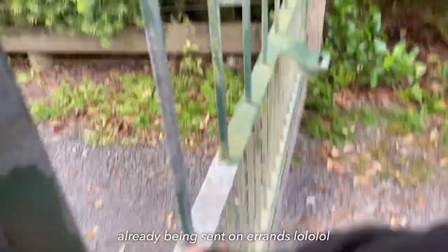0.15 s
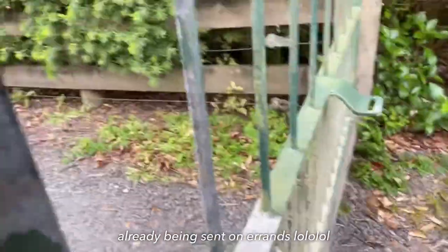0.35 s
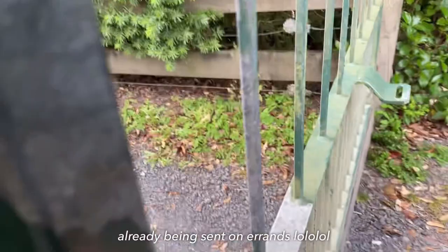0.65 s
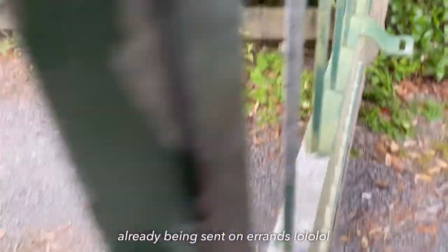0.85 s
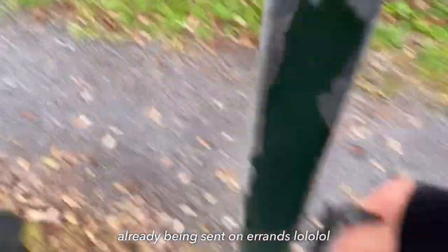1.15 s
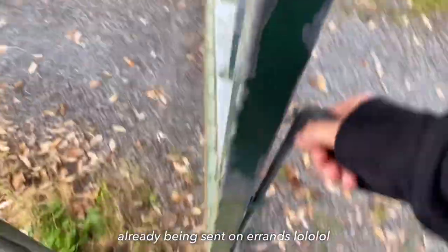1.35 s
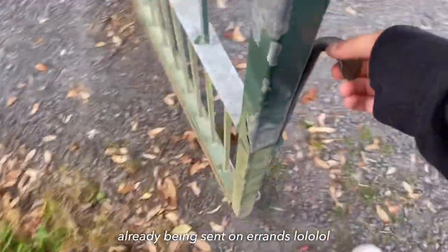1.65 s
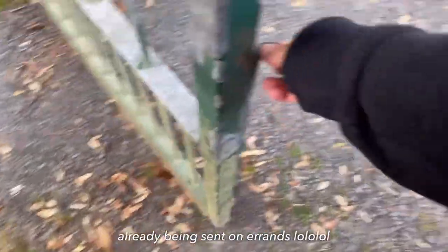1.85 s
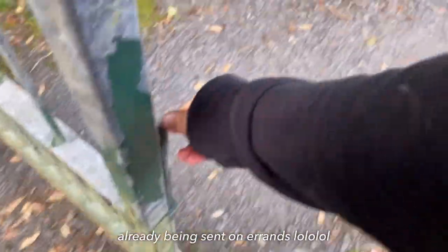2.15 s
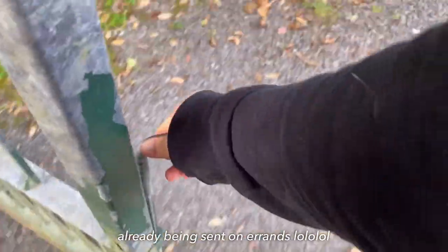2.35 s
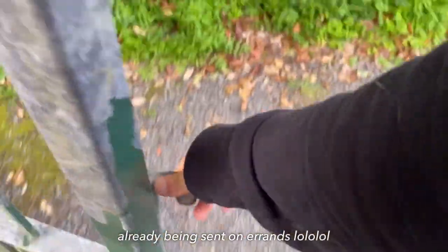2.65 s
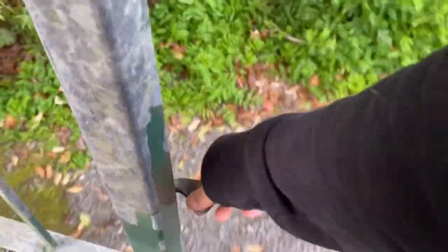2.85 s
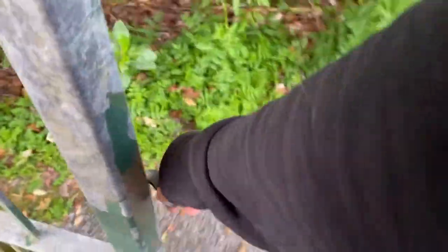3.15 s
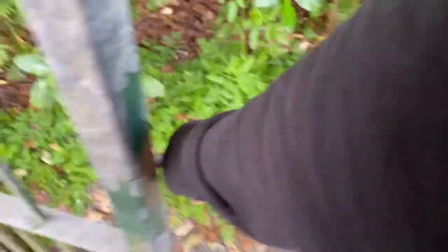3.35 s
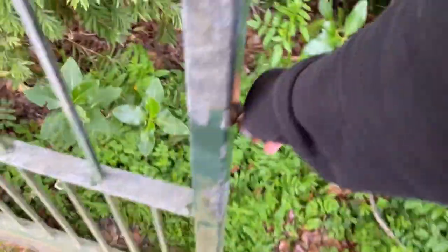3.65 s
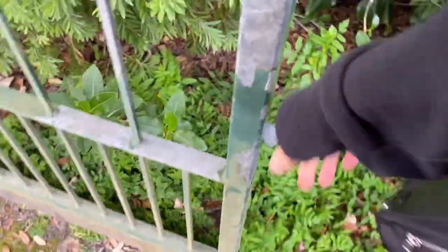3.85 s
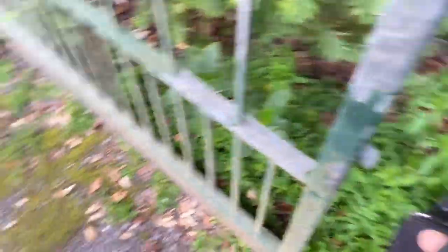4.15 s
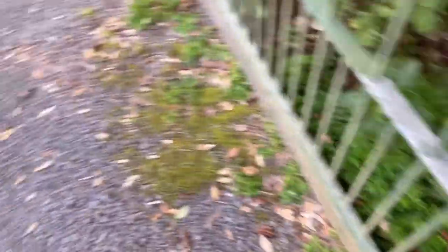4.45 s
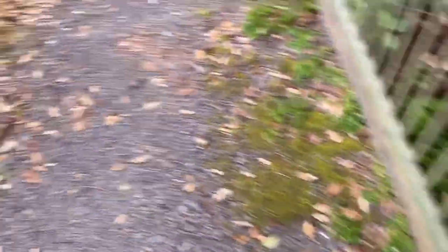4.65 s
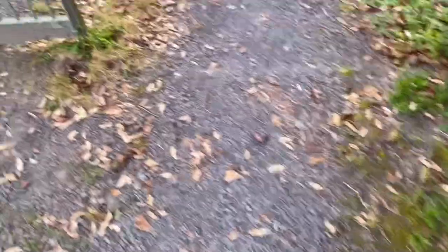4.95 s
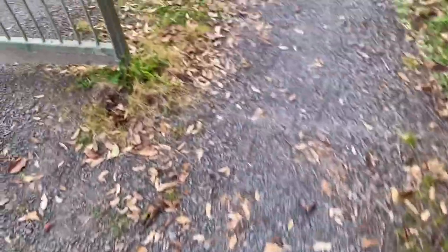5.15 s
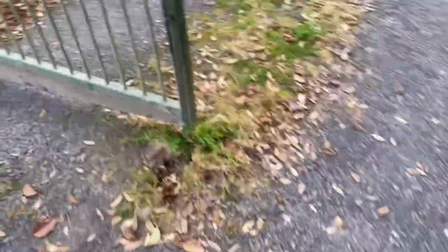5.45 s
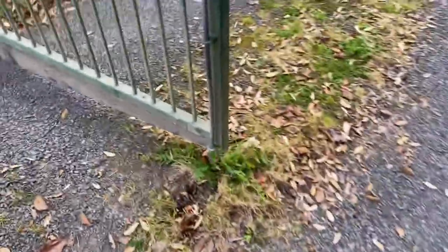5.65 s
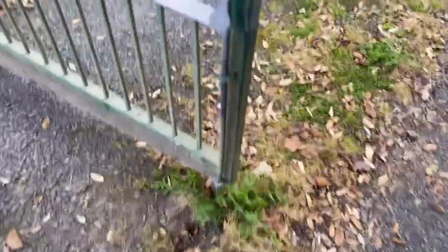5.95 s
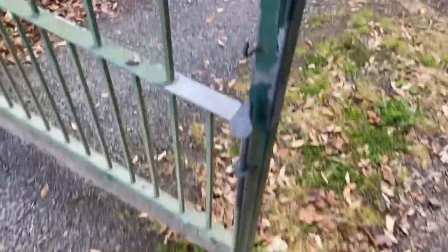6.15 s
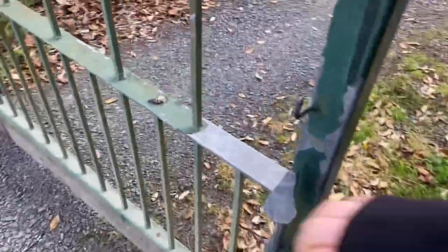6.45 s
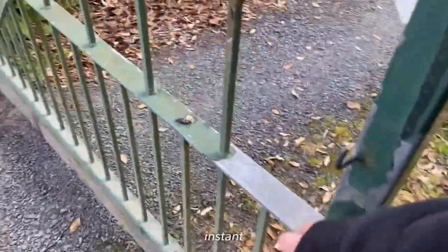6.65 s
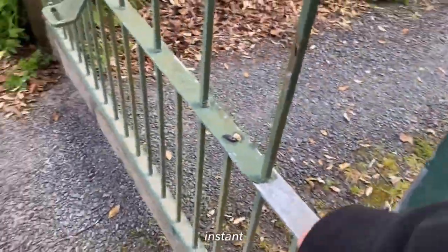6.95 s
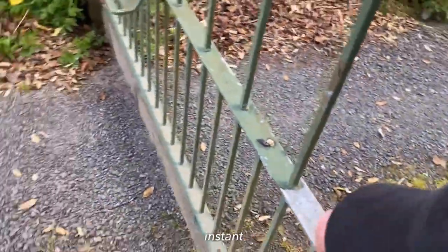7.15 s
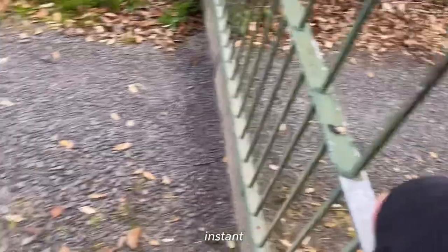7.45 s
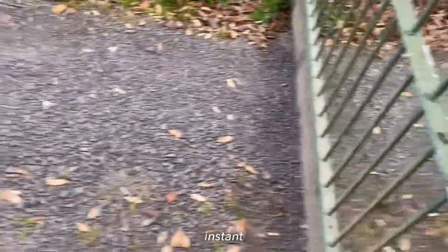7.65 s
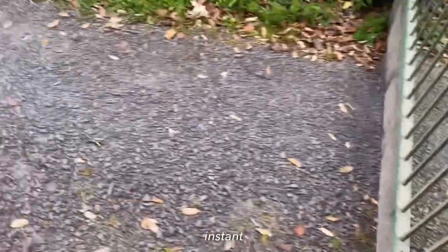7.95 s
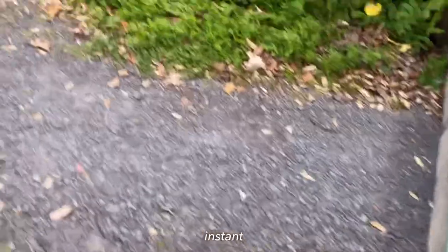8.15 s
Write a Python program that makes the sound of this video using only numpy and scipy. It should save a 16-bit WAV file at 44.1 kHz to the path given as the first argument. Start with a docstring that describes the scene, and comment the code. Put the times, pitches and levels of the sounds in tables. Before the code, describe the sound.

A steel gate is opened outdoors: its bolt squeals and clanks, metal rings and a hinge shrieks, with footsteps on gravel.

```python
"""Steel gate on a gravel drive

Close up, on a phone's stereo microphones, held by someone opening both leaves of a steel bar gate.
The drop bolt is pulled, squeals and clanks; the leaves knock against their stops and ring; a dry hinge
sticks and slips in a shriek. Shoes crunch on gravel and dry leaves just below, the hand bumps the
phone, a gust buffets the microphone ports, and traffic hums far off."""
import sys
import numpy as np
from scipy import signal
from scipy.fft import rfft, irfft, next_fast_len
from scipy.io import wavfile
from scipy.ndimage import uniform_filter1d, map_coordinates

SR = 44100
rng = np.random.default_rng(int(sys.argv[2]) if len(sys.argv) > 2 else 0)


def wav_record(signal):
    """Record a signal, one row per channel, as 16-bit PCM in the file named by sys.argv[1]."""
    frames = np.transpose(np.atleast_2d(signal))
    bounded = np.clip(frames, -1, 1)
    # unit amplitude maps onto the largest positive 16-bit level
    quanta = np.round(bounded * 32767).astype(np.int16)
    wavfile.write(sys.argv[1], SR, quanta)


N = 366471

# Strong modes of the bolt and each gate leaf. Each row: pitch in Hz, level in dB, base seconds to
# fall 60 dB.
BOLT_MODES = [(307.5, -20.5, 1), (656, -23.5, 2.7), (855, -16, 0.36), (924, -20, 1), (1055, -14.5, 0.23),
              (1255, -18, 1.3), (1577, -21, 0.3), (1870, -27.5, 2.7), (2040, -16.5, 0.73),
              (2088, -26.5, 2.2), (2600, -18.5, 0.25), (2800, -21.5, 1.3), (3040, -22, 0.6),
              (3190, -15.5, 0.3), (3380, -11, 0.61), (3709, -16.5, 0.46), (3940, -14.5, 0.27),
              (4320, -9, 0.18), (4530, -8, 0.32), (4840, -9.5, 0.55), (5430, -19, 0.25), (5690, -9.5, 0.46),
              (5943, -15.5, 0.26), (6460, -16, 0.28), (7200, -12.5, 0.21), (7300, -10.5, 0.2),
              (7340, -10, 0.19), (10400, -11, 0.5)]
LEFT_LEAF_MODES = [(276, -22, 0.85), (393, -6.5, 0.52), (507, -25, 2.4), (648, -22.5, 2.2),
                   (898, -23, 0.54), (1283, -4, 0.35), (1454, -16, 0.71), (1885, -13.5, 0.61),
                   (2134, -12.5, 1.1), (2440, -13.5, 0.55), (2544, -4.5, 0.58), (2670, -7, 0.55),
                   (2688, -4.5, 0.75), (2799, -8.5, 0.46), (3000, -18, 0.53), (3030, -8.5, 0.43),
                   (3120, -15, 0.3), (3280, -24.5, 2.4), (3666, -18.5, 1.1), (4090, -19.5, 0.7),
                   (4170, -19, 1.2), (4350, -9, 0.45), (4570, -10, 0.63), (4838, -10.5, 0.5),
                   (5330, -12, 0.91), (5750, -5.5, 0.44), (6600, -9.5, 0.29), (8800, -13.5, 1.4)]
RIGHT_LEAF_MODES = [(174, -14.5, 1.5), (270, -19.5, 1.7), (397, -23, 1.1), (488, -19, 1.5),
                    (630, -21.5, 2.3), (1303, -32, 0.99), (2005, -10.5, 0.95), (2215, -12.5, 1.9),
                    (2395, 0, 0.45), (2497, 1.5, 0.46), (2870, -12, 0.9), (2990, -14, 1.9),
                    (3315, -14.5, 1.1), (3830, -15.5, 0.57), (4100, -9.5, 0.3), (4290, -15.5, 1.3),
                    (4410, -12.5, 1.1), (4640, -8.5, 0.65), (5630, -7.5, 0.35), (6260, -10.5, 0.18),
                    (6730, -6.5, 0.22), (7180, -14.5, 0.52), (6920, -19.5, 1)]
# The steel's many weak modes. Each row: frequency in Hz, level in dB.
WEAK_MODE_SPECTRUM = [(150, -30), (500, -3.5), (1200, -5.5), (2500, -3), (5000, -5.5), (7500, -3),
                      (11000, -5), (15000, -15)]
# Their decay. Each row: frequency in Hz, base seconds to fall 60 dB.
WEAK_MODE_T60 = [(200, 1), (1000, 0.97), (3000, 0.5), (7000, 0.47), (14000, 0.42)]
# Blows, by steel part. Each row: start in seconds, pitch favoured by the point of impact in Hz, level,
# bass, brightness and treble in dB, ring length factor, weak modes over strong ones in dB.
BLOWS = { "bolt": [(0.5033, 2040, -33, -0.5, -12.5, -47, 0.55, 4.5),
         (0.6055, 2040, -33, -3, -13.5, -25.5, 0.46, 9), (0.8325, 855, -29.5, 0, 3.5, -16, 0.52, -2),
         (0.853, 1055, -37.5, 4.5, 4.5, -20.5, 0.53, -4), (0.874, 3380, -34.5, 0, 2.5, -20, 0.8, -1.5),
         (1.2246, 4160, -16.5, -30, 2, -8.5, 0.51, 5.5), (1.2364, 7330, -28, -5, -3.5, -6, 0.9, 2),
         (1.4117, 2090, -32, -1, -9.5, -20.5, 0.98, 3.5),
         (1.4594, 1255, -29.5, -3.5, -21.5, -32.5, 0.86, -4),
         (1.6994, 1055, -42.5, 3.5, -18, -16.5, 0.8, 2.5)],
         "left": [(0.0185, 2508, -25.5, -18, -29.5, -43.5, 1.2, 7.5),
         (0.0275, 3110, -28, -11, -18, -35, 0.8, 7), (0.0465, 3149, -28, -8, -4, -26, 0.35, 3),
         (0.0653, 2688, -29.5, -8.5, -25, -35.5, 1.5, 1.5), (0.105, 1890, -27.5, -1.5, -15, -49, 0.094, 2),
         (3.6815, 2600, -32, -7.5, 9.5, -6, 1.06, 5.5), (3.7677, 400, -40.5, -1, -10.5, -9.5, 1.7, 8.5),
         (3.8036, 1880, -30, -5, -0.5, -10.5, 2.2, 3), (3.8462, 2799, -18.5, -5.5, 4, 4.5, 0.28, 2.5),
         (3.8695, 4838, -26.5, -22, 5.5, -1.8, 0.64, 5.5), (3.916, 2970, -25.5, -21, -16, -15, 1.56, -2.5),
         (4.1495, 4215, -35.5, 3.5, 7, -10, 0.61, 3), (4.1692, 2060, -39, 7, 4, -29, 1.06, 2),
         (4.345, 3370, -46.5, 4, -5.5, -25, 1.4, 8.5), (4.4295, 4570, -45.5, 6.5, -2.5, -40, 0.9, 8.5)],
         "right": [(6.6783, 2160, -46.5, -2, -11, -25.5, 0.79, 7.5),
         (6.7387, 1303, -40.5, -3, -4.5, -19.5, 0.4, 10.5), (6.8134, 4544, -29.5, -27.5, 7.5, -4, 1.1, 6.5),
         (7.1233, 7130, -34.5, -7, 7, 8, 0.3, 6.5), (7.135, 630, -39, 4, 2.5, -12, 1.23, 2.5)], }
# Steel rubbing on steel, by part. Each row: peak time in seconds, level in dB, rise and fall in
# seconds per 20 dB.
RUBS = { "bolt": [(.43, -43.5, 0.17, 0.4), (.88, -44.5, 0.038, 0.14), (1.1, -58, 0.62, 0.28),
        (1.222, -18.5, 0.014, 0.076), (1.34, -37.5, 0.2, 0.31), (1.62, -47, 0.22, 0.12)],
        "left": [(0.001, -29, 0.056, 0.2), (3.69, -28.5, 0.0069, 0.052), (3.8, -26, 0.1, 0.15),
        (3.87, -33.5, 0.15, 0.15), (4.16, -28.5, 0.14, 0.14), (4.27, -53, 0.5, 1)],
        "right": [(6.69, -55, .005, 0.33), (6.76, -42.5, .05, 0.23), (6.83, -35, 0.062, 0.11),
        (6.98, -38.5, 0.044, 0.29), (7.3, -45, 0.3, 0.096)], }
# Stick-slip squeals of the bolt and one hinge. Each row: time in seconds, pitch in Hz, level in dB.
BOLT_CREAK = [(0.38, 1119, -60), (0.395, 1103, -42.5), (0.42, 1138, -37.5), (0.448, 1141, -49),
              (0.484, 1146, -47.5), (0.5, 1200, -52)]
BOLT_WHINE = [(1.03, 3440, -58.5), (1.074, 3476, -51.5), (1.098, 3485, -32), (1.14, 3459, -35),
              (1.172, 3456, -48), (1.216, 3486, -46.5), (1.222, 3430, -45)]
HINGE_GROAN = [(6.675, 890, -56), (6.69, 914, -47.5), (6.72, 848, -43), (6.75, 917, -38.5),
               (6.78, 910, -40), (6.82, 880, -47.5)]
HINGE_SHRIEK = [(6.74, 2367, -52), (6.778, 2394, -36), (6.806, 2354, -18.5), (6.84, 2416, -13.5),
                (6.96, 2410, -30.5), (7.005, 2425, -19), (7.04, 2387, -28), (7.07, 2380, -45),
                (7.142, 2368, -28), (7.2, 2360, -49)]
HINGE_SHRILL = [(6.79, 7050, -55.5), (6.808, 7060, -23.5), (6.85, 7070, -25), (6.898, 7340, -39.5),
                (6.95, 7360, -29), (6.99, 7230, -31.5), (7.06, 7300, -33.5), (7.126, 7276, -27),
                (7.18, 7050, -49)]
# Partials of the squeals. Each row: multiple of the pitch, gain in dB.
CREAK_PARTIALS = [(1, 1.5), (2, -1.5), (3, 0.5), (4, -8.5), (5, -15)]
WHINE_PARTIALS = [(1, 3), (2, -5), (3, -3.5), (4, -19)]
GROAN_PARTIALS = [(.93, -0.5), (1, -7), (1.054, -6), (1.195, -5.5), (1.36, -4)]
SHRIEK_PARTIALS = [(.979, -6), (1, 2)]
# The dry hinge grinding. Each row: frequency in Hz, level in dB.
RASP_SPECTRUM = [(2800, -29.5), (4700, -4), (5200, -7.5), (6300, -2), (7500, -3), (8600, -9), (9700, -7.5),
                 (12000, -13.5), (15300, -20.5)]

# Treads and scuffs. Each row: peak time in seconds, gravel and dry leaves in dB, rise and fall in
# seconds per 20 dB.
TREADS = [(0.254, -37, -48, 0.083, 0.13), (1.609, -57, -27.5, 0.042, 0.03), (1.911, -45, -41, 0.021, 0.034),
          (1.943, -40.5, -69, 0.039, 0.16), (2.1, -50.5, -44, 0.057, 0.058), (2.612, -42, -79, 0.13, 0.047),
          (2.876, -70, -33, 0.014, 0.018), (3.088, -40, -44, 0.15, 0.1), (3.538, -45.5, -57, 0.16, 0.013),
          (4.741, -35, -53, 0.0081, 0.085), (4.928, -70, -65, 0.024, 0.012),
          (5.25, -54, -79.5, 0.011, 0.05), (5.37, -38, -50, 0.098, 0.05),
          (5.74, -54.5, -68.5, 0.031, 0.043), (5.814, -37, -32, 0.027, 0.085),
          (6.278, -58, -45.5, 0.049, 0.033), (6.41, -56, -64.5, 0.36, 0.1), (7.53, -48.5, -59, 0.02, 0.059),
          (7.94, -49.5, -84.5, 0.08, 0.025), (8.198, -42.5, -56, 0.027, 0.077)]
# Shuffling between treads. Each row: time in seconds, gravel in dB, dry leaves in dB.
SHUFFLE = [(1.5, -45, -73), (1.7, -50, -62), (1.95, -65, -58), (2.3, -61.5, -50.5), (2.8, -51.5, -50),
           (3.3, -61.5, -48.5), (3.66, -50.5, -44), (3.75, -58.5, -56.5), (4.6, -52.5, -65.5),
           (4.95, -59.5, -55), (5.2, -64, -105), (6.03, -67, -67.5), (6.6, -79.5, -86.5), (7.4, -61, -75.5),
           (7.55, -56.5, -66), (7.85, -68, -64), (8.31, -59.5, -64.5)]
# Single stones snapping underfoot. Each row: start in seconds, level in dB, tick over knock in dB,
# the knock's left over right in dB.
STONE_SNAPS = [ (0.247, -28, -30, -17), (0.272, -23.5, -30, -12.5), (0.345, -32, -25, -3),
               (1.63, -35.5, 10, 6), (1.897, -35.5, 5, -2), (1.914, -33.5, -5, -25), (2.009, -29, -30, 1),
               (2.058, -36, -11, -7), (2.115, -35.5, -12, -6), (2.18, -53, 11, 8), (2.254, -37, -32, -6),
               (2.269, -47.5, 16, -12), (2.339, -49.5, 18, -3.5), (2.572, -27, -26, -10),
               (2.582, -25, -25, -3), (2.6, -29.5, -25, -10), (2.614, -31.5, -24, -15),
               (2.652, -38.5, -20, -16), (2.688, -31.5, 4, -15), (2.868, -47, 24, -3),
               (2.877, -35.5, 19.5, -8), (3.024, -26.5, -9, -5), (3.063, -25.5, -4, -13),
               (3.08, -26.5, 5, -7), (3.108, -25, -8, -5), (3.154, -48, -11, -11), (3.473, -34.5, 6, -18),
               (3.512, -27, -13, -9), (3.53, -29.5, -13.5, -13), (4.723, -37.5, -13, -9.5),
               (4.745, -23, -19, -5.5), (4.927, -29, -33, -11), (4.969, -34, -33, -14),
               (5.259, -34, -30, -6), (5.35, -25, -22, -13), (5.369, -28, -36.5, -7),
               (5.808, -33.5, 9, -16), (5.8344, -29.5, 11, -7.5), (5.859, -31.5, -1.5, -17),
               (5.892, -44, 2.5, -7), (6.0741, -59, 17.5, -5.5), (6.2357, -53, 13, -6.5),
               (6.3076, -49.5, 8, -9), (6.37, -38.5, -9, -19), (6.4697, -59, 18, -5),
               (7.532, -25.5, -12.5, -4.5), (7.552, -27, -30.5, 5), (7.592, -28.5, -40, 2),
               (7.938, -34.5, -29.5, -4.5), (8.181, -33, 0.5, -7), (8.194, -25, -33, -5)]
# Crunch of gravel and of dry leaves. Each row: frequency in Hz, level in dB.
GRAVEL_SPECTRUM = [(150, -47), (250, -9), (873, -3), (2020, -8), (2740, -13.5), (3480, -14), (6000, -23),
                   (7800, -54), (13200, -120)]
DRY_LEAF_SPECTRUM = [(1200, -24.5), (2200, -8.5), (4000, -7.5), (7000, -7), (10000, -6.5), (13000, -14.5),
                     (15500, -9.5)]

# Wind on the ports. Each row: time in seconds, rumble in dB, brighter edge over rumble in dB.
WIND_LEVELS = [(0.0, -57.5, 4), (0.6, -56.5, 1.5), (1.1, -52.5, -9), (1.4, -60, 6.5), (2.1, -54.5, -7.5),
               (3.3, -53.5, -8.5), (3.75, -53.5, -2.5), (4.1, -57.5, 1), (4.81, -51, -15), (4.88, -36, -33),
               (5.07, -30, -36), (5.26, -32, -3.5), (5.44, -38, -12), (5.69, -47.5, -23.5),
               (5.9, -64, -2.5), (6.66, -61.5, -23.5), (6.97, -93, 15), (7.29, -60, 5.5),
               (8.31, -56.5, -10)]
# Eddies bursting on the ports. Each row: start in seconds, peak in dB, pitch in Hz.
EDDIES = [(4.871, -35, 117), (4.967, -26, 69.8), (4.975, -30.5, 190), (5.031, -20, 168.4),
          (5.066, -24, 178), (5.085, -29.5, 130), (5.162, -23, 112.7), (5.193, -28.5, 76.5),
          (5.231, -23, 181), (5.292, -22, 152), (5.344, -32, 206), (5.412, -46.5, 79), (5.507, -39, 151.8),
          (5.574, -33.5, 60.2), (5.703, -46.5, 87.2)]
# Short low bumps of the hand moving the phone. Each row: peak time in seconds, level in dB.
HANDLING_BUMPS = [(0.619, -54.5), (.78, -46), (.95, -45), (1.214, -36), (2.17, -47), (2.71, -45.5),
                  (4.21, -42.5), (4.63, -52.5), (6.8, -43)]
# Low rumble, and the far traffic and hedge. Each row: frequency in Hz, level in dB.
RUMBLE_SPECTRUM = [(18, -41.5), (35, -7.5), (60, 2.5), (110, -2.5), (200, -13), (400, -36), (800, -70.5)]
DISTANT_SPECTRUM = [(70, -43), (130, -19), (300, -9), (1000, -20.5), (2600, -22.5), (5000, -26),
                    (8000, -24), (12000, -29), (16000, -31.5)]
# How alike left and right sound. Each row: frequency in Hz, correlation from 0 to 1.
STEREO_LIKENESS = [(60, 0.63), (300, 0.39), (1500, 0.42), (4000, 0.43), (6000, 0.47), (7500, 1), (16000, 1)]
# Left and right treble swing in and out of phase, hollowing narrow bands. Each row: frequency in Hz,
# lead of the left in radians.
TREBLE_PHASE = [(6900, 0), (8300, np.pi), (10200, np.pi), (11200, 2 * np.pi), (13100, 2 * np.pi),
                (14500, 3 * np.pi)]


def gate():
    """Drop bolt and both leaves, close to the microphones; only the bolt and the right hinge squeal."""
    creak = squeal(BOLT_CREAK, CREAK_PARTIALS, flutter_db=2.6, waver=.006, pan_db=2)
    whine = squeal(BOLT_WHINE, WHINE_PARTIALS, flutter_db=1.2, waver=.0015, pan_db=-1.5)
    hinge = squeal(HINGE_GROAN, GROAN_PARTIALS, flutter_db=4, waver=.057, pan_db=-3.5)  # taking the load
    hinge += squeal(HINGE_SHRIEK, SHRIEK_PARTIALS, flutter_db=3, waver=.0033, pan_db=-5.5)
    hinge += squeal(HINGE_SHRILL, [(.97, -11), (1, 1), (1.02, -5)],
                    flutter_db=3.5, waver=.007, pan_db=6.5)
    bolt = steel_part(BOLT_MODES, BLOWS["bolt"], RUBS["bolt"], creak + whine,
                      rub_weak_db=5.5, rattle_db=3, rub_treble_db=-3.5, pan_db=-1, crack_db=5)
    left = steel_part(LEFT_LEAF_MODES, BLOWS["left"], RUBS["left"], np.zeros((2, N)),
                      rub_weak_db=6, rattle_db=.5, rub_treble_db=-3, pan_db=-3.5, crack_db=10)
    right = steel_part(RIGHT_LEAF_MODES, BLOWS["right"], RUBS["right"], hinge,
                       rub_weak_db=6, rattle_db=-4.5, rub_treble_db=0, pan_db=-4, crack_db=-1)
    return bolt + left + right


def steel_part(modes, blows, rubs, squeals, rub_weak_db, rattle_db, rub_treble_db, pan_db, crack_db):
    """One steel part: struck at each blow, shaken by uneven rubbing, and set ringing by its squeals."""
    knocks = np.zeros((2, N + 2 * SR))
    bins = SR * 3 // 5 + 1  # spectrum of a 1.2 s ring
    present = rng.random(bins) < .05  # a weak mode about every 17 Hz
    weak_modes = present * amp(2.2 * rng.standard_normal(bins)) + .02
    favour_db = 10  # lift of the mode nearest the favoured pitch
    for start, favoured_hz, db, bass_db, bright_db, treble_db, length, weak_db in blows:
        colour = [(900, bass_db), (2000, .0045), (3200, .006),
                  (5000, bright_db), (7500, bright_db), (12000, treble_db)]
        nearest = min((hz for hz, _, _ in modes), key=lambda hz: abs(hz - favoured_hz))
        struck = [(hz, level + favour_db * (hz == nearest), t60) for hz, level, t60 in modes]
        hit = steel_ring(struck, weak_modes, colour, np.clip(length, .1, 2), weak_db, crack_db)
        add_at(knocks, start, amp(db) * hit)
    friction = swells(rubs) * amp(rattle_db * wobble(60)) * rng.standard_normal(N)
    force = friction + amp(-8.5) * squeals[0]
    rub_colour = [(500, -1.5), (2000, 4.5), (4000, 5), (6000, rub_treble_db),
                  (8500, rub_treble_db - .5), (12000, rub_treble_db - 11.5)]
    body = steel_ring(modes, weak_modes, rub_colour, length=.21, weak_db=rub_weak_db, crack_db=13.5)
    rubbed = signal.fftconvolve(force[None], body / np.linalg.norm(body[0]), axes=1)
    steel = spread(knocks[:, :N] + rubbed[:, :N])
    balance = [(6000, pan_db), (8000, .0038)]  # the treble stays centred
    return filtered(steel, lambda hz: pan(along(balance, hz))) + squeals


def steel_ring(modes, weak_modes, colour, length, weak_db, crack_db):
    """Steel after one blow: a crack of contact, then strong modes ringing over many weak ones."""
    t = np.arange(2 * (len(weak_modes) - 1)) / SR
    strong = strong_ring(modes, t, length)
    weak = weak_ring(weak_modes, t, length)
    hiss = filtered(rng.standard_normal((2, len(t))), lambda hz: hz ** 2 / (hz ** 2 + 1200 ** 2))
    crack = amp(crack_db - 60 * t / .03) * hiss  # thin below 1200 Hz
    onset = slice(SR // 50)
    ring = strong / strong[:, onset].std() + amp(weak_db) * weak / weak[:, onset].std() + crack
    attack = 1 - np.exp(-t / .0008)
    fade = np.minimum(1, (t[-1] - t) / .22)
    return coloured(ring, colour) * attack * fade


def strong_ring(modes, t, length):
    """Decaying modes; similar bars ring in close clusters, so each mode's level and phase wander."""
    hz, db, t60 = np.transpose(modes)[:, :, None]
    level_draw, phase_draw = rng.standard_normal((2, 2, len(modes), 1))
    knots = rng.standard_normal((2, 2, len(modes), 64))
    knot, blend = (t * 30).astype(int), t * 30 % 1  # 30 knots a second
    level_drift, phase_drift = knots[..., knot] * (1 - blend) + knots[..., knot + 1] * blend
    beating = np.abs(1 + .69 * level_drift)
    swell = 1 - np.exp(-hz * t / 3)  # a mode needs a few cycles to build
    decay = amp(db + 2.8 * level_draw - 60 * t / (np.minimum(t60, 2.6) * length))
    phase = 2 * np.pi * hz * t + np.pi * phase_draw + .65 * phase_drift
    return (decay * beating * swell * np.sin(phase)).sum(1)


def weak_ring(weak_modes, t, length):
    """A dense wash of weak modes, some regions favoured by the point of impact; the highs die first."""
    regions = amp(2.3 * unit(uniform_filter1d(rng.standard_normal(len(weak_modes)), 350)))
    wash = unit(irfft(weak_modes * regions * rfft(rng.standard_normal((2, len(t))))))
    wash += amp(2.5 - 60 * t / (.23 * length)) * rng.standard_normal((2, len(t)))  # loose joints rattle
    hz, frame_s, frames = signal.stft(wash, SR, nperseg=128)
    t60 = length * along(WEAK_MODE_T60, hz)[:, None]
    decay = amp(along(WEAK_MODE_SPECTRUM, hz)[:, None] - 60 * frame_s / t60)
    return signal.istft(frames * decay, SR, nperseg=128)[1][:, :len(t)]


def squeal(rows, partials, flutter_db, waver, pan_db):
    """A stick-slip tone: each partial flutters alone; the low ones reach each port at their own phase."""
    hz = curves(rows, outside=rows[0][1])[0]
    db = curves(rows)[1]
    phase = 2 * np.pi * np.cumsum(hz * (1 + waver * wobble(90))) / SR
    tone = np.zeros((2, N))
    for multiple, level in partials:
        gain = amp(level + multiple ** .5 * flutter_db * wobble(50))
        offset = rng.normal(0, .63, (2, 1)) * (multiple < 2.5)
        tone += gain * np.sin(multiple * phase + offset)
    return uniform_filter1d(amp(db), 500) * tone * pan(pan_db)


def hinge_rasp():
    """While the hinge shrills, its dry faces grind in patches and excite the right leaf's upper modes."""
    def resonance(f):
        return .7 + sum(amp(db + 13.5) / (1 + 2j * (f - hz) / 45)
                        for hz, db, _ in RIGHT_LEAF_MODES if hz > 2800)

    effort = uniform_filter1d(amp(curves(HINGE_SHRILL)[1]), 2500)
    grind = patchy(gritty(RASP_SPECTRUM, per_second=400, spread_db=3, share=.22), depth_db=3.5)
    return effort * spread(unit(filtered(grind, resonance)))


def footsteps():
    """Shoes below the microphones grind gravel and crush dry leaves; single stones snap out."""
    gravel, leaves = amp(curves(SHUFFLE))
    gravel += swells([(s, db, rise, fall) for s, db, _, rise, fall in TREADS])
    leaves *= amp(.72 * wobble(6.7))
    leaves += amp(3.6 * wobble(50)) * swells([(s, db, rise, fall) for s, _, db, rise, fall in TREADS])
    gravel *= amp(.75 * wobble(43))
    grind = patchy(gritty(GRAVEL_SPECTRUM, per_second=450, spread_db=4, share=.46), depth_db=4)
    rustle = patchy(gritty(DRY_LEAF_SPECTRUM, per_second=310, spread_db=8.5, share=.32), depth_db=4.5)
    crunch = spread(gravel * grind + leaves * rustle)
    for start, db, tick_db, pan_db in STONE_SNAPS:
        add_at(crunch, start, amp(db) * stone_snap(tick_db, pan_db))
    return crunch


def stone_snap(tick_db, pan_db):
    """One stone snaps under the sole: a dull knock to one side and a bright tick in the centre."""
    t = np.arange(SR // 25) / SR
    burst = rng.standard_normal(len(t)) * (amp(-60 * t / .0033) + amp(-11 - 60 * t / .032))
    knock = coloured(burst, [(250, -10.5), (900, 12), (2200, 2.5), (5000, -53), (9000, -44)])
    tick = coloured(burst, [(2500, -43), (5000, -4), (9000, 5.5), (15000, -2)])
    return pan(pan_db) * knock / np.abs(knock).max() + amp(tick_db) * tick / np.abs(tick).max()


def wind_and_handling():
    """Lumpy wind rumble on both ports and low bumps of the hand; in the gust, eddies thump and spit."""
    db, edge_db = curves(WIND_LEVELS)
    lumps = amp(2.5 * wobble(22))
    rumble = unit(lumps * gritty(RUMBLE_SPECTRUM, per_second=160, spread_db=5, share=.36))
    edge_spectrum = [(100, -17.5), (220, -2), (400, -4.5), (700, -22), (1200, -61.5)]
    edge = unit(lumps * gritty(edge_spectrum, per_second=61, spread_db=2.5, share=.61))
    spits = swells([(s, peak_db - 10, .0087, .035) for s, peak_db, _ in EDDIES])
    bumps = swells([(s, bump_db, .033, .026) for s, bump_db in HANDLING_BUMPS])
    mid, side = (amp(db) + bumps) * rumble + (amp(db + edge_db) + spits) * edge
    t = np.arange(SR // 20) / SR
    for start, peak_db, hz in EDDIES:
        cycles = hz * t
        thump = np.sin(2 * np.pi * cycles) * cycles * np.exp(-1.5 * cycles)
        add_at(mid, start, amp(peak_db) * thump / np.abs(thump).max())
    sides = np.array([[1], [-1]])
    return filtered(mid + .16 * sides * side, lambda hz: np.exp(-.27j * sides))  # the left lags


def distant_traffic():
    """Traffic and a hedge far off: a steady bed of noise whose level wavers a little."""
    level = amp(-65.5 + 1.4 * wobble(20))
    return level * spread(gritty(DISTANT_SPECTRUM, per_second=100, spread_db=0, share=.05))


def gritty(spectrum, per_second, spread_db, share):
    """Coloured noise with a share of sharp grains of random size; two channels, rms 1."""
    hits = rng.random((2, N)) < per_second / SR
    grains = hits * amp(spread_db * np.minimum(rng.exponential(size=(2, N)), 3))
    noise = rng.standard_normal((2, N)) * (share * unit(grains) + 1 - share)
    return unit(coloured(noise, spectrum))


def patchy(x, depth_db):
    """x with random patches of gain, some 700 Hz wide and 20 ms long; rms 1."""
    frames = signal.stft(x, nperseg=256)[2]
    patches = uniform_filter1d(rng.standard_normal(frames.shape[1:]), 4, axis=0)
    patches = unit(uniform_filter1d(patches, 6, axis=1))
    return unit(signal.istft(frames * amp(depth_db * patches), nperseg=256)[1][:, :N])


def swells(rows):
    """Summed gain of swells. Each row: peak time in seconds, dB, rise and fall in seconds per 20 dB."""
    t = np.arange(0, N / SR, 1 / 1000)
    gain = sum(amp(db - 20 * np.where(t < s, (s - t) / max(rise, .003), (t - s) / max(fall, .003)))
               for s, db, rise, fall in rows)
    return np.interp(np.arange(N) / SR, t, gain)


def curves(rows, outside=-120):
    """One value per sample for each column after the time."""
    times, *columns = np.transpose(rows)
    return [np.interp(np.arange(N) / SR, times, column, outside, outside) for column in columns]


def wobble(rate):
    """A smooth random curve, rate knots a second."""
    return map_coordinates(rng.standard_normal(int(N * rate / SR) + 4), [np.arange(N) * rate / SR])


def spread(pair):
    """Two unrelated signals mixed to a left and right that are partly alike."""
    def weights(hz):
        angle = np.arccos(np.clip(along(STEREO_LIKENESS, hz), -1, 1)) / 2
        return np.array([np.cos(angle), np.sin(angle)])

    mid, side = filtered(pair, weights)
    return np.array([mid + side, mid - side])


def filtered(x, response):
    """x through a complex response of frequency."""
    n = x.shape[-1]
    padded = next_fast_len(n + 8192)
    return irfft(rfft(x, padded) * response(np.fft.rfftfreq(padded, 1 / SR)), padded)[..., :n]


def coloured(x, spectrum):
    """x shaped by (Hz, dB) points."""
    return filtered(x, lambda hz: amp(along(spectrum, hz)))


def along(points, hz):
    """(Hz, value) points interpolated on a log axis."""
    point_hz, values = np.transpose(points)
    return np.interp(np.log(hz + 1), np.log(point_hz + 1), values)


def add_at(track, start, sound):
    """Mix sound into track from start seconds on."""
    span = track[..., round(start * SR):][..., :sound.shape[-1]]
    span += sound[..., :span.shape[-1]]


def pan(db):
    """Left and right gains, the left louder by db."""
    return amp(db * np.array([[.5], [-.5]]))


def amp(db):
    """Gain of a level in dB."""
    return 10 ** (np.asarray(db) / 20)


def unit(x):
    """x at rms 1."""
    return x / np.sqrt(np.mean(x ** 2) + 1e-20)


def scene():
    """The drive as heard standing at the gate."""
    return gate() + hinge_rasp() + footsteps() + wind_and_handling() + distant_traffic()


def record(dry):
    """Left and right treble swing in and out of phase, peaks round off, the top ends at 16.4 kHz."""
    turned = filtered(dry, lambda hz: np.exp(.5j * along(TREBLE_PHASE, hz) * np.array([[1], [-1]])))
    rounded = turned / (1 + np.abs(turned / .97) ** 6) ** (1 / 6)
    roll_off = [(15700, -1), (15950, -15.5)]
    return filtered(rounded, lambda hz: amp(along(roll_off, hz)) * (hz < 16400))


dry = scene()
out = record(dry)
wav_record(out)
```